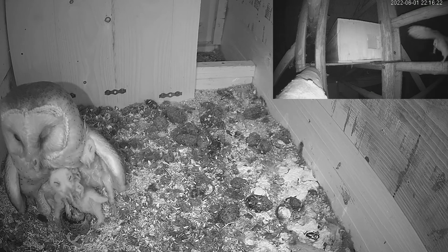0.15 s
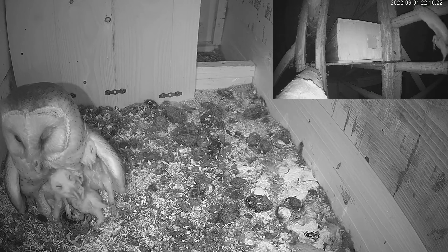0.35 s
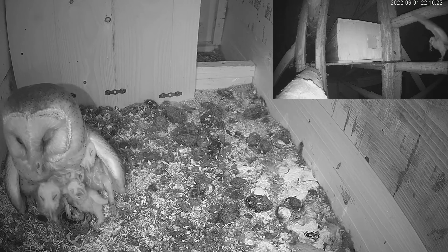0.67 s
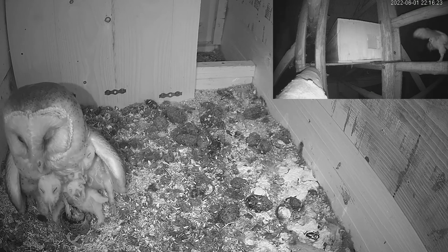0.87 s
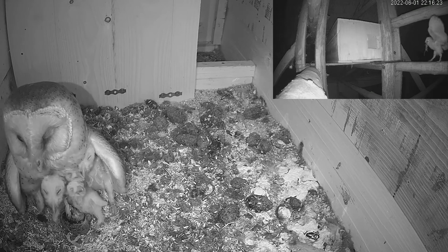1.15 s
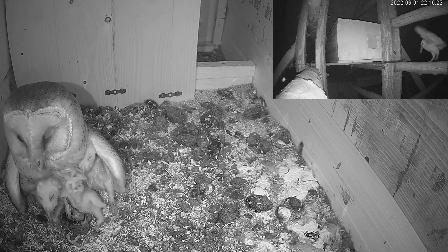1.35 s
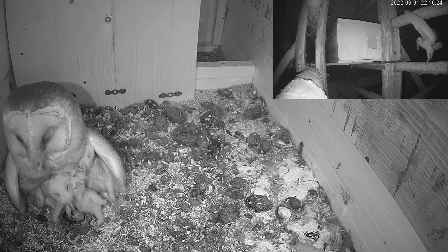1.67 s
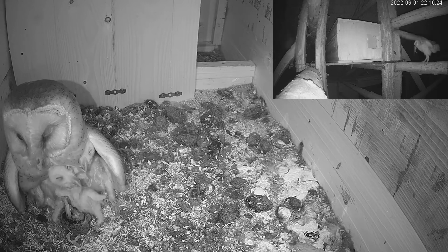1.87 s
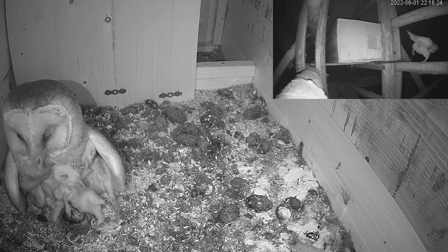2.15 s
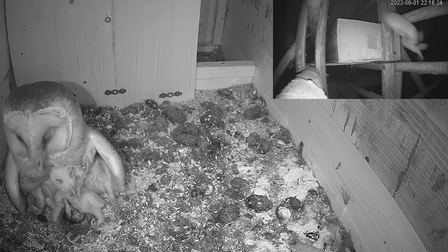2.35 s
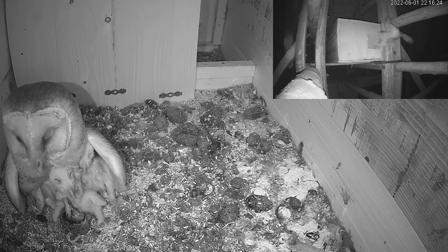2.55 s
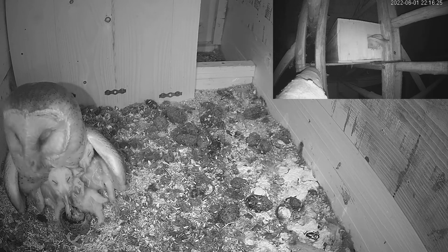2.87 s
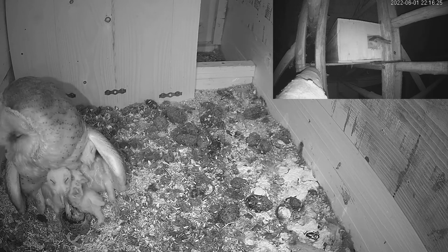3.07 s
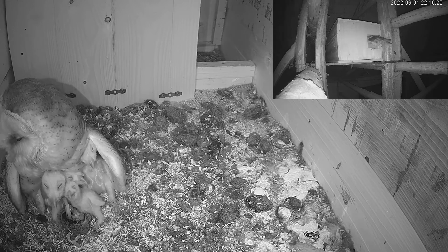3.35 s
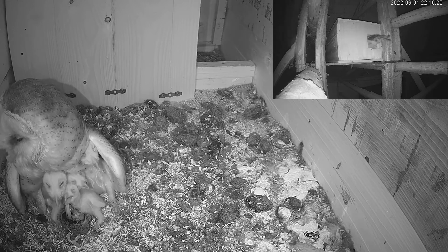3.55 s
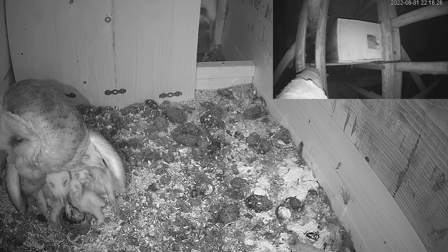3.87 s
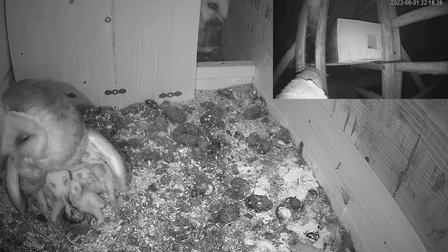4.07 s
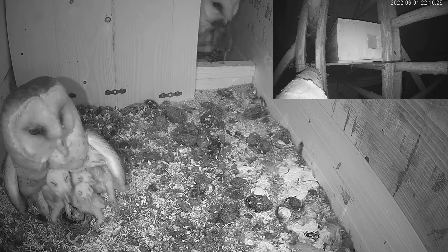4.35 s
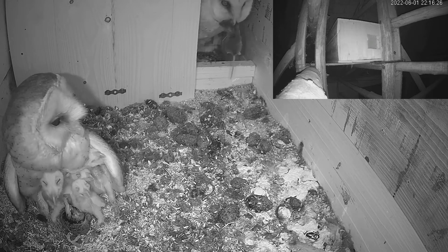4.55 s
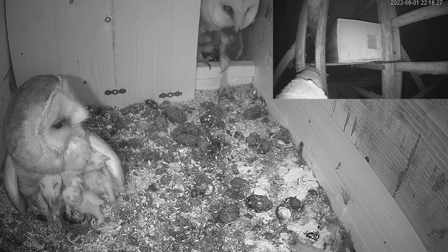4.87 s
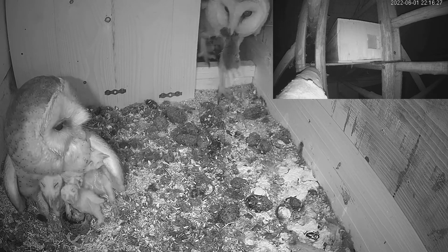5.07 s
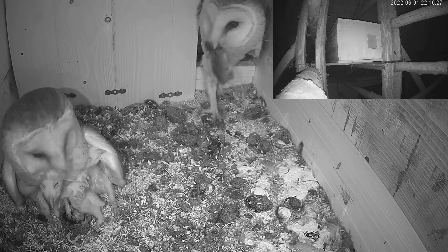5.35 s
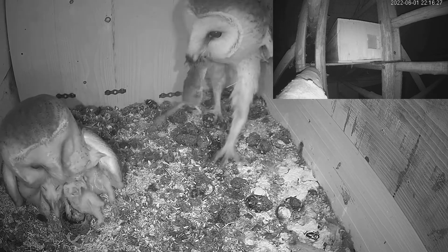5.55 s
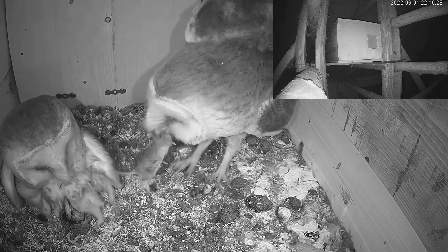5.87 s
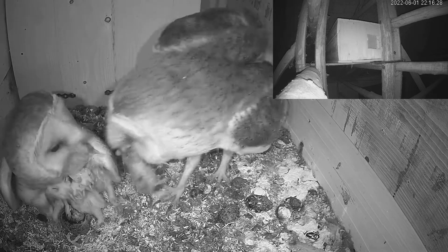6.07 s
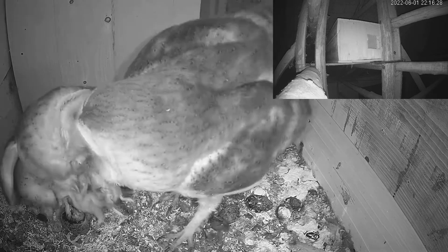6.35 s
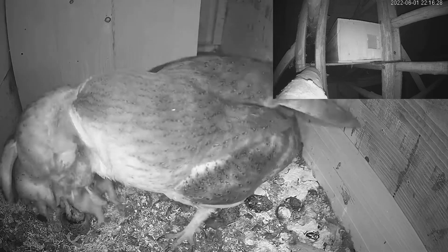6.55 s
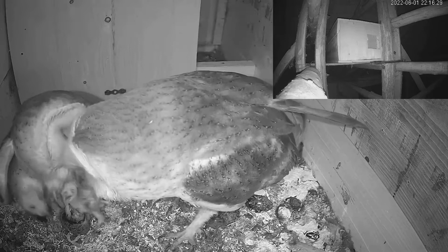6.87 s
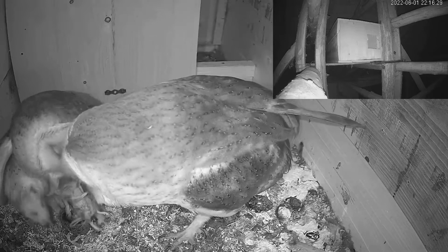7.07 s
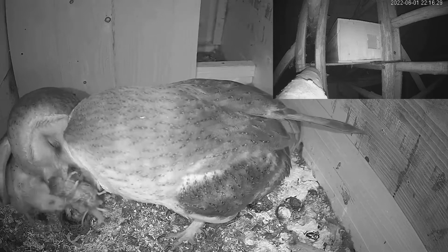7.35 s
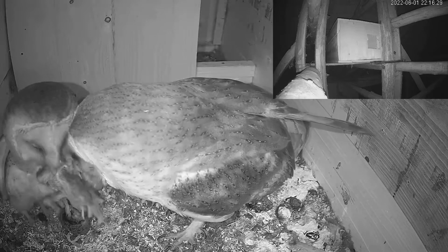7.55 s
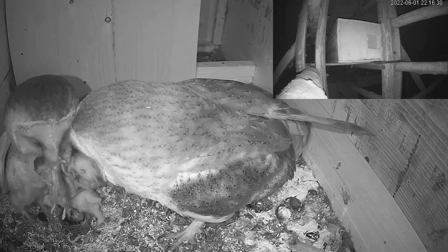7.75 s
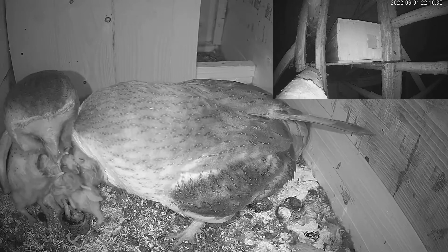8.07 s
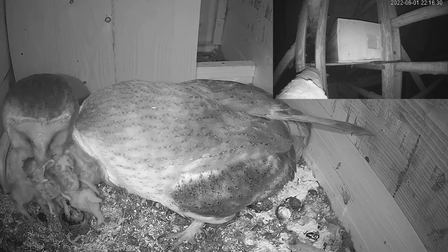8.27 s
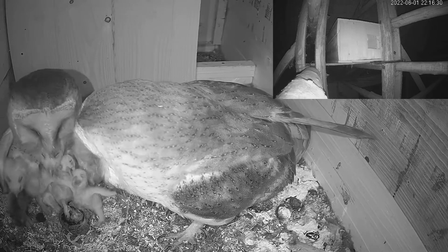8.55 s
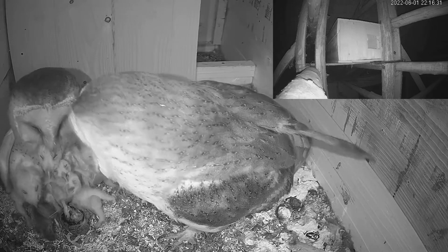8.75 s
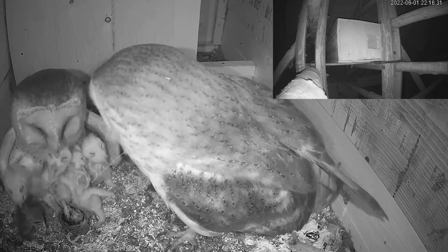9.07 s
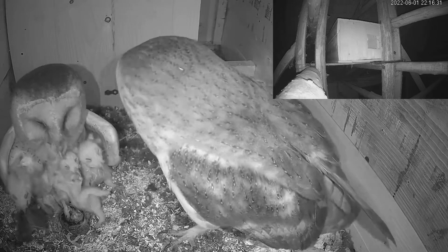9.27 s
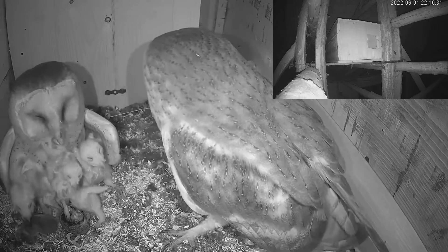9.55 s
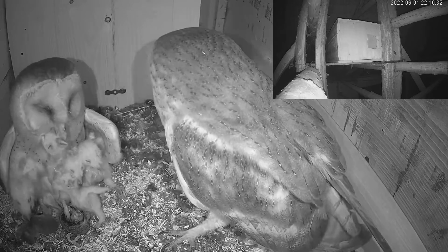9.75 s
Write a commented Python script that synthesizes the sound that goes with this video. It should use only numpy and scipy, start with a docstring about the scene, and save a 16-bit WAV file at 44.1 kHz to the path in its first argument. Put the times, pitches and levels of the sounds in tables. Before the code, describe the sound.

Inside a small wooden nest box at night, heard from a close mono microphone with faint rumble and hiss. A half-second, bright hissing snore starts at 0.4 s and ends in a tiny squeak. Very faint footfalls come near 1.1 s. At 2.0 s a heavy, low, boomy thump with a gritty scrape marks an owl landing, and a second long hiss follows at 2.35 s. Knocks and claw scrapes scramble over wood from 2.85 to 3.75 s, sharpest at 3.4. A throaty rasp opens into hiss at 3.9 s; light scratching follows. From 4.9 to 6 s, soft twittering overlaps rough rasps at 5.1 and 5.95. Another hiss at 6.35 s mixes with quick chips until 6.65. More chips at 7.1-7.4 s lead into a rasp that becomes a hiss until 7.9. A long hiss comes at 8.3 s, a soft low thud at 9.0, and a last short rasp with a squeak at 9.4-9.75.

```python
"""Barn owls snore in a wooden nest box at night, close to a small mono camera microphone.
Long hisses (turbulent noise through beak resonances) and lower, throaty rasps (saturated noise)
follow each other, most ending in a tiny gliding harmonic squeak. The male lands with a thump (decaying
box modes), scrambles in (grainy noise scrapes) and twitters, in short notes with an octave, as he hands
over prey. Faint rumble, hiss and a thin treble ring lie beneath; short echoes make the box."""
import sys
import numpy as np
from scipy import signal
from scipy.fft import rfft, irfft, next_fast_len
from scipy.io import wavfile
from scipy.ndimage import uniform_filter1d, map_coordinates

SR = 44100
rng = np.random.default_rng(int(sys.argv[2]) if len(sys.argv) > 2 else 0)


def master_out(mix):
    """Clip the mix to full scale and print it as 16-bit PCM to the path in sys.argv[1]."""
    frames = np.transpose(np.atleast_2d(mix))
    ceiling = np.clip(frames, -1, 1)
    pcm = np.round(ceiling * 32767).astype(np.int16)
    wavfile.write(sys.argv[1], SR, pcm)


N = 437031
TIME = np.arange(N) / SR
FREQS = np.maximum(np.fft.rfftfreq(next_fast_len(N, True), 1 / SR), 1)
TOP_HZ = 13250  # upper limit of the microphone

SNORE_ATTACK_S, SNORE_RELEASE_S = 0.056, 0.015
SNORE_SWELL_DB, SNORE_SAG_DB = 12, 13
SIZZLE_SWELL_DB, SIZZLE_SAG_DB = 12.5, 12
SWELL_POWER, SAG_POWER = 2.06, 3.5  # curvature of effort before and after the crest
BURST_SHARE, BURST_S = 0.45, 0.01  # the air breaks through at once with this share of its strength
CATCH_AFTER_S, CATCH_S, CATCH_DB = 0.006, 0.0063, -0.5  # a last puff of air as the throat closes

RASP_ATTACK_S, RASP_RELEASE_S = 0.0093, 0.023
BEAK_OPENS_S, BEAK_SHUTS_S = 0.02, 0.051  # time constant of opening; fade of the treble at the end
MOUTH_FOLLOWS, TREBLE_FOLLOWS = 0.81, 0.31  # dB per dB of effort
BEAK_SWEEP_S, THROAT_RISE_SHARE = 0.07, 0.7  # the throat resonance rises less than those of the beak

CHIP_GLIDE, CALM_S = -0.324, 6.31  # chips fall by this share of pitch until the birds meet, then stay level
CHIP_OCTAVE_DB, OCTAVE_FOLLOWS = -43.5, 0.22  # the octave gains little with level: soft chips are brightest
TWITTER_PERIOD_S, TWITTER_SCATTER = 0.047, 0.0184  # scatter as share of pitch
PEEP_S, PEEP_OCTAVE_DB = 0.03, 14.5  # a peep sounds mostly on its octave
PEEP_GLIDE_SCATTER = 0.084  # share of pitch
TICK_AFTER_S, TICK_S, TICK_DB, TICK_OCTAVE_DB = 0.042, 0.0078, -4.5, 7.5  # level relative to peep's octave

SCRATCH_GAP_S, SCRATCH_SCATTER_S, SCRATCH_SCATTER_DB = 0.045, 0.0044, 1
SCRATCH_T60_S, SCRATCH_HZ = 0.13, 2230
SHUFFLE_FADE_S = 0.17
FLOOR_DB = -64
RING_HZ, RING_DB = 9647, -12  # level relative to the treble around it


def snores(flutter_db=0.5, flutter_hz=90, throat_db=1.5, hiss_db=-1.43, sizzle_db=-1.03):
    """Turbulent jet noise filtered by the open beak; the throat joins in as effort grows."""
    # hisses, levels before the common trims above: (start [s], length [s], hiss [dB],
    # crest [share of length], throat [dB], throat growth over the call [dB], sizzle [dB],
    # sizzle crest [share of length])
    calls = [(0.393, 0.5586, -34.5, 0.67, -55.5, 2.5, -43, 0.48),
             (2.347, 0.55, -35, 0.59, -49, 15.5, -43, 0.44),
             (6.351, 0.5165, -38, 0.78, -57, -3, -45.5, 0.32), (8.275, 0.56, -35, 0.62, -49, 5, -38, .52)]
    # resonances of beak and box in the first two hisses: (frequency [Hz], width [Hz], relative level [dB])
    first_rows = [(710, 930, -25), (1300, 560, -15), (1940, 66, -17), (2660, 1460, -14.5), (3737, 460, -5),
                  (4330, 80, -11.5), (5000, 530, -7), (5856, 340, -1.5), (6390, 190, 3.5), (6970, 640, 5.5),
                  (8150, 720, 3.5), (9340, 670, -2.5), (10740, 410, -4), (11400, 470, -1),
                  (12460, 1600, -2)]
    # the same in the last two hisses, with the head held differently: (frequency [Hz], width [Hz], relative
    # level [dB])
    second_rows = [(804, 1320, -14.5), (1040, 100, -11.5), (2120, 970, -13), (2840, 900, -11),
                   (3580, 830, -2.5), (4340, 120, -11), (5000, 590, -1), (6380, 1600, 3.5),
                   (6860, 370, 9.5), (8150, 910, -2), (9380, 710, -3.5), (10600, 410, -6),
                   (12000, 1500, -4)]
    out = np.zeros(N)
    first_pose, second_pose = resonances(first_rows), resonances(second_rows)
    low, middle, high = band(150, 2790), band(2880, 6120), band(7470, 12400)
    shapes = (first_pose, first_pose, second_pose, second_pose)
    for call, shape in zip(calls, shapes):
        start, length, hiss, crest, throat, growth, sizzle, sizzle_crest = call
        progress = np.clip((TIME - start) / length, 0, 1)
        throat_effort = growth * (progress - 0.5) + arch(start, length, crest, swell_db=4, sag_db=7.5)
        hiss_effort = arch(start, length, crest, SNORE_SWELL_DB, SNORE_SAG_DB)
        sizzle_effort = arch(start, length, sizzle_crest, SIZZLE_SWELL_DB, SIZZLE_SAG_DB)

        jet = noise(shape * low) * undb(throat + throat_db + throat_effort)
        jet += noise(shape * middle) * undb(hiss + hiss_db + hiss_effort)
        jet += noise(shape * high) * undb(sizzle + sizzle_db + sizzle_effort)

        burst = gate(start, length, BURST_S, SNORE_RELEASE_S)
        steady = gate(start, length, SNORE_ATTACK_S, SNORE_RELEASE_S) ** 2
        catch_time = TIME - start - length - CATCH_AFTER_S
        catch = undb(CATCH_DB) * np.exp(-(catch_time / CATCH_S) ** 2)
        out += jet * (catch + BURST_SHARE * burst + (1 - BURST_SHARE) * steady)
    flutter = unit(undb(flutter_db * wander(flutter_hz)))
    return out * flutter


def rasps(rattle_db=1.0, rattle_hz=220, buzz=0.058):
    """Source and filter: the syrinx rattles chaotically into the throat; upper bands open with the beak."""
    # rasps; the fourth runs on into the fifth, a hiss. Throat lies below 1.6 kHz, mouth reaches 3 kHz,
    # beak about 9 kHz, sizzle 13 kHz: (start [s], length [s], throat [dB], crest [share of length],
    # swell [dB], sag [dB], mouth [dB], beak [dB], sizzle [dB], beak opens at [s],
    # treble gained by opening [dB], rise of the resonances [share])
    calls = [(3.924, 0.4934, -40, 0.59, 28.5, 15, -42, -40, -46.5, 4.203, 19, 0.00024),
             (5.095, 0.35, -40.5, 0.57, 8.5, 11, -48, -61, -63.5, 5.07, 21, 0.039),
             (5.945, 0.33, -34.5, 0.86, 13.5, 25, -43, -53.5, -46.5, 6.1, 16, 0.095),
             (7.387, 0.3, -35.5, 0.35, 7, 11.5, -47, -51.5, -46.5, 7.45, 7, 0.052),
             (7.531, 0.354, -47, 0.2, 18, 4, -47.5, -43, -43, 7.6, 14, .1),
             (9.416, 0.319, -34, 0.59, 16, 12.5, -47, -50, -51, 9.485, 12, .07)]
    # throat and beak resonances, one set per rasp: (frequency [Hz], width [Hz], relative level [dB])
    resonance_sets = [
        [(456, 280, -7.5), (1286, 870, 0.5), (2140, 290, -4.5), (2620, 270, -2.5), (3200, 370, -9.5),
         (4600, 1050, -16), (5120, 160, -9), (5980, 650, -17), (8000, 2200, -24.5), (9260, 280, -17),
         (13100, 6200, -20)],
        [(480, 500, -15), (1095, 430, -4), (1370, 300, -4), (1890, 63, -9), (2570, 1250, -16),
         (4870, 890, -25.5), (6070, 250, -28), (12000, 2600, -23)],
        [(715, 1400, -14.5), (1147, 410, 4.5), (1348, 77, 6.5), (1930, 590, -11), (2470, 610, -10.5),
         (4860, 1400, -30), (9500, 900, -28.5), (11500, 10000, -33), (12600, 1100, -25)],
        [(430, 380, -16), (1047, 240, -1), (1310, 260, 0), (1840, 220, -12.5), (2640, 1500, -17.5),
         (3600, 570, -17), (6400, 1300, -21.5), (7900, 1900, -25), (9460, 1100, -19), (12100, 2500, -29)],
        [(566, 340, -7.5), (1050, 430, -2.5), (1720, 880, -8), (2410, 390, -7), (3340, 710, -4),
         (4300, 660, -3), (5380, 1100, 1), (6500, 2300, -2), (7730, 790, 0.5), (9330, 660, -4.5),
         (10600, 600, -6), (12300, 1900, -11)],
        [(450, 280, -19), (1054, 480, -8), (1407, 104, 2), (2070, 390, -12.5), (2790, 920, -14.5),
         (4810, 320, -29), (5620, 600, -22.5), (7800, 5000, -27.5), (11940, 1400, -19)],
    ]
    out = np.zeros(N)
    low, middle, high, top = band(100, 1610), band(1870, 3150), band(3250, 9600), band(7260, 13000)
    for call, rows in zip(calls, resonance_sets):
        start, length, throat, crest, swell, sag, mouth, beak, sizzle, opens, opening_db, rise = call
        shape = resonances(rows)
        effort = arch(start, length, crest, swell, sag)

        throat_noise = sweep(noise(shape * low), opens, THROAT_RISE_SHARE * rise)
        analytic = signal.hilbert(throat_noise, next_fast_len(N))[:N]
        # a self-sustained vibration saturates, so its strength is steadier than that of noise
        saturated = analytic.real / np.sqrt(1 + buzz * np.abs(analytic) ** 2)
        voiced = unit(saturated) * undb(throat + effort)
        air = noise(shape * middle) * undb(mouth + MOUTH_FOLLOWS * effort)

        shut = 0.5 - 0.5 * np.tanh((TIME - opens) / (2 * BEAK_OPENS_S))
        treble = noise(shape * high) * undb(beak) + noise(shape * top) * undb(sizzle)
        treble = sweep(treble, opens, rise) * undb(TREBLE_FOLLOWS * effort - opening_db * shut)

        out += (voiced + air) * gate(start, length, RASP_ATTACK_S, RASP_RELEASE_S)
        out += treble * gate(start, length, RASP_ATTACK_S, BEAK_SHUTS_S)
    rattle = unit(undb(rattle_db * wander(rattle_hz)))
    return out * rattle


def squeaks(jitter=0.037, spread=0.46, darken=2.66, attack=0.83):
    """Membranes catch and whistle: harmonics under a spectral hump that moves with the gliding pitch."""
    # squeaks: (start [s], length [s], start pitch [Hz], end pitch [Hz], level before the fades [dB],
    # brightest frequency at the start [Hz])
    whistles = [(0.0, 0.029, 4230, 4680, -56.5, 3680), (0.946, 0.019, 2146, 1190, -46.5, 7200),
                (2.402, 0.019, 9000, 10200, -46.5, 8500), (2.446, 0.046, 10440, 12100, -44, 9200),
                (2.889, 0.019, 2320, 1260, -49.5, 6440), (4.413, 0.016, 1550, 1070, -49, 2700),
                (6.864, 0.024, 2480, 1480, -50, 6700), (8.833, 0.0151, 2120, 1240, -43.5, 7900),
                (9.724, 0.015, 5400, 5100, -40.5, 9100), (9.737, 0.011, 5060, 2840, -51.5, 7100),
                (9.859, 0.0045, 9400, 6900, -58, 9000)]
    out, wobble = np.zeros(N), wander(690)
    for start, length, from_hz, to_hz, db, bright_hz in whistles:
        u = np.linspace(0, 1, int(length * SR))
        i = int(start * SR)
        glide = to_hz / from_hz
        hz = from_hz * glide ** u * (1 + jitter * wobble[i:i + len(u)])
        partials = np.arange(1, 8)[:, None] * hz
        centre = bright_hz * glide ** (2 * darken * u ** 2)
        weights = np.exp(-(np.log(partials / centre) / spread) ** 2 / 2) * (partials < TOP_HZ)
        phases = 2 * np.pi * np.cumsum(partials, axis=1) / SR
        tone = np.sum(weights * np.sin(phases), axis=0)
        add(out, start, undb(db) * unit(tone) * np.sin(np.pi * u ** attack))
    return out


def twitter(bow=0.14, snap=1.26, jitter=0.028, third_db=-27, air_db=-9, breathy=0.79, gain_db=-2.03):
    """Additive synthesis of short arched or falling notes; those with a stronger octave carry more air."""
    out, puff = np.zeros(N), np.zeros(N)
    wobble = wander(290)
    for start, length, hz, db, octave_db, glide in twitter_notes():
        # the notes' soft edges reach beyond the listed start and length
        u = np.linspace(0, 1, int(1.283 * length * SR))
        shape = np.sin(np.pi * u)
        i = int(start * SR)
        bend = bow * (shape - 0.8) + glide * (u - 0.5) + jitter * wobble[i:i + len(u)]
        phase = 2 * np.pi * np.cumsum(hz * (1 + bend)) / SR
        tone = np.sin(phase) + undb(octave_db) * np.sin(2 * phase) + undb(third_db) * np.sin(3 * phase)
        add(out, start - 0.18 * length, np.sqrt(2) * undb(db) * np.abs(shape) ** snap * tone)
        # the air leads the tone
        add(puff, start - 0.51 * length, undb(db + breathy * octave_db) * shape)
    air = noise(resonances([(990, 1130, 2.5), (2900, 350, 1.0), (9200, 870, -9.0), (11900, 1400, -12)]))
    return undb(gain_db) * (out + undb(air_db) * puff * air)


def twitter_notes():
    """Pulse trains with random pitch: (start s, nominal length s, pitch Hz, dB, relative octave dB, glide)."""
    # loud chips, before the common gain: (start [s], nominal length [s], pitch [Hz], level [dB])
    chips = [(4.935, .012, 1173, -51.5), (5.006, 0.017, 1228, -46), (5.07, 0.011, 1135, -47),
             (5.098, .011, 1130, -49), (5.447, .018, 1150, -48), (5.486, 0.014, 1222, -33),
             (5.52, .0045, 1190, -38), (5.528, 0.0081, 1164, -43), (5.545, 0.012, 1179, -37),
             (5.565, .01, 1236, -42.5), (5.628, 0.0145, 1237, -40), (5.68, 0.012, 1495, -45.5),
             (5.729, 0.0091, 1320, -39), (5.751, 0.0064, 1190, -39.5), (6.263, 0.02, 1100, -37.5),
             (6.364, 0.011, 1078, -33), (6.382, 0.005, 1080, -31.5), (6.401, .012, 1178, -32.5),
             (6.431, .045, 1197, -35.5), (6.488, 0.041, 1197, -37), (6.596, 0.0059, 1074, -36),
             (6.617, 0.0092, 1097, -31), (7.115, .012, 1133, -50), (7.167, 0.0109, 1037, -37),
             (7.186, 0.0061, 1012, -33.5), (7.237, 0.0038, 1010, -39), (7.25, 0.0039, 1100, -35.5),
             (7.259, .013, 1034, -32), (7.316, 0.004, 1030, -41), (7.384, 0.013, 1116, -36),
             (9.412, 0.016, 1024, -38), (9.723, 0.019, 1166, -44)]
    # soft runs of thin peeps alternating with breathy ticks, before the common gain:
    # (start [s], length [s], mean pitch [Hz], level of the peep's octave [dB], mean peep glide [share of pitch])
    peep_runs = [(0.058, .21, 1174, -70, 0), (0.963, .02, 1018, -60, 0), (1.045, .02, 946, -63.5, -0.014),
                 (4.988, .02, 1300, -51, -0.32), (5.045, .02, 1160, -47.5, 0.022),
                 (5.474, .02, 1168, -45.5, -0.13), (5.666, .02, 1160, -50.5, -0.11),
                 (5.712, .02, 1118, -47, -.2), (5.788, .165, 1163, -50.5, 0), (7.111, .02, 1118, -61, 0)]
    notes = []
    for s, length, hz, db in chips:
        octave_db = CHIP_OCTAVE_DB + OCTAVE_FOLLOWS * db - db
        notes.append((s, length, hz, db, octave_db, CHIP_GLIDE * (s < CALM_S)))
    chances = rng.standard_normal((len(peep_runs), 10, 2))
    for (start, length, hz, db, glide), chance in zip(peep_runs, chances):
        end = start + length
        for s, (sharp, bend) in zip(np.arange(start, end, TWITTER_PERIOD_S), chance):
            pitch = hz * (1 + TWITTER_SCATTER * sharp)
            peep_glide = glide + PEEP_GLIDE_SCATTER * bend
            notes.append((s, PEEP_S, pitch, db - PEEP_OCTAVE_DB, PEEP_OCTAVE_DB, peep_glide))
            tick_at = s + TICK_AFTER_S
            if tick_at < end:
                notes.append((tick_at, TICK_S, pitch, db + TICK_DB, TICK_OCTAVE_DB, CHIP_GLIDE))
    return notes


def blows(boards_db=-19, boards_t60=0.21, spread=1.68):
    """Modal excitation: weight and hardness of a footfall decide which register of box modes it reaches."""
    # modes of the box: (frequency [Hz], relative level [dB], full t60 [s])
    box_modes = [(53.7, -2, 0.72), (77, -2, 0.29), (101, -12, 0.075), (121.2, 7.5, 0.3), (152.3, 1, 0.21),
                 (214, -13.5, 0.27), (303.8, -5, 0.36), (398.3, -6, 0.31), (440.6, 8, 0.12),
                 (497.7, -1, 0.26), (564, 7.5, 0.05), (796, 3, 0.13), (1067, 11, 0.038), (1305, -3, 0.055)]
    # feet on the boards: (start [s], peak level [dB], register [Hz], rise [s], share of full ring time)
    footfalls = [(1.106, -55, 490, .015, 1.3), (1.196, -52, 85, .008, 1.4),
                 (1.984, -13.5, 126, 0.012, 1.09), (1.988, -30.5, 470, 0.0046, .4),
                 (2.851, -39, 430, 0.0054, 0.81), (2.893, -36.5, 125, 0.0051, 0.54),
                 (3.059, -36, 125, 0.0023, 1.2), (3.116, -35, 495, 0.0042, 0.53),
                 (3.167, -37, 220, 0.0063, 1.4), (3.383, -28.5, 483, 0.0022, 0.79),
                 (3.401, -24.5, 390, 0.00057, 0.5), (3.405, -28.5, 67.6, 0.0025, 0.64),
                 (3.693, -37.5, 534, 0.0024, 0.72), (3.745, -55, 565, 0.0043, 0.93),
                 (4.484, -52, 550, .008, 0.95), (4.273, -44, 131, 0.0039, 0.4),
                 (4.724, -44.5, 516, 0.0025, 0.14), (4.82, -40.5, 98, 0.013, 0.27),
                 (5.587, -39.5, 103, 0.022, .3), (6.374, -41.5, 91, 0.0071, 0.47),
                 (7.025, -45, 75, 0.0084, 0.56), (9.012, -36, 65.6, 0.0058, 1.12),
                 (9.013, -45.5, 210, .004, 0.37), (9.77, -51.5, 60, 0.013, 0.58)]
    out, t = np.zeros(N), TIME[:SR * 3 // 4]
    for start, db, centre_hz, rise, share in footfalls:
        ring = np.zeros(len(t))
        for hz, mode_db, t60 in box_modes:
            reach = 1 / (1 + ((hz / centre_hz - centre_hz / hz) / spread) ** 2) ** 2
            ring += undb(mode_db) * reach * np.sin(2 * np.pi * hz * t) * decay(t, t60 * share)
        # loose boards and litter add a dense, irregular rumble
        edges = [centre_hz / 2, centre_hz * 1.53]
        rumble = unit(bandpassed(rng.standard_normal(len(t)), edges))
        ring = ring / np.abs(ring).max() + undb(boards_db) * rumble * decay(t, boards_t60)
        ring = ring * (1 - np.exp(-(t / rise) ** 2))
        add(out, start, undb(db) * ring / np.abs(ring).max())
    return out


def claws(grain_db=4, rise=0.0025, low_hz=400):
    """Stick-slip friction: talons catch on the wood in short, grainy bursts of band-limited noise."""
    # claws and bills on wood: (start [s], level before rise and decay [dB], t60 [s], upper band edge [Hz])
    scrapes = [(1.976, -41.5, 0.11, 2630), (2.045, -28.5, .039, 4800), (3.06, -46, .074, 1260),
               (3.114, -42, .1, 1780), (3.155, -46.5, 0.16, 1800), (3.218, -52, .093, 2800),
               (3.381, -33.5, 0.023, 2010), (3.397, -29, 0.033, 1890), (3.477, -55, 0.05, 2000),
               (3.697, -50, 0.083, 1440), (4.724, -43, 0.053, 1500), (5.588, -48.5, 0.11, 7500),
               (7.888, -46.5, .039, 2000), (8.133, -44, 0.045, 2030)]
    out, t = np.zeros(N), TIME[:SR // 4]
    for start, db, t60, bright_hz in list(scrapes) + scratches():
        # each grain holds a random level for 40 samples
        grain_levels = np.repeat(rng.standard_normal(len(t)), 40)[:len(t)]
        grains = rng.standard_normal(len(t)) * undb(grain_db * grain_levels)
        scrape = unit(bandpassed(grains, [low_hz, bright_hz]))
        add(out, start, undb(db) * scrape * decay(t, t60) * (1 - np.exp(-t / rise)))
    return out


def scratches():
    """Jittered pulse trains of light scrapes as (start s, dB, t60 s, upper band edge Hz)."""
    # scratching between the loud scrapes: (start [s], length [s], mean level before rise and decay [dB])
    spells = [(2.174, .13, -57.5), (4.485, .4, -60.5)]
    events = []
    for start, length, db in spells:
        for s in np.arange(start, start + length, SCRATCH_GAP_S):
            late, hard = rng.standard_normal(2)
            events.append((s + SCRATCH_SCATTER_S * late, db + SCRATCH_SCATTER_DB * hard,
                           SCRATCH_T60_S, SCRATCH_HZ))
    return events


def shuffle():
    """Random forcing of resonators: small steps keep the low modes of the box humming."""
    # spells of shuffling on the boards: (start [s], length [s], hum of the main mode [dB], deep rumble [dB])
    spells = [(2.056, 1.33, -54.5, -69), (2.94, 0.71, -52.5, -63), (4.2, 1.25, -64.5, -59),
              (5.29, 0.65, -68, -61.5), (6.145, 1.3, -76.5, -64)]
    out = np.zeros(N)
    hum = noise(resonances([(116, 21, 5.5), (426, 240, -23.5)]))
    rumble = noise(resonances([(90, 41, -11), (52, 29, -12), (407, 320, -25.5)]))
    for start, length, hum_db, rumble_db in spells:
        steps = undb(hum_db) * hum + undb(rumble_db) * rumble
        out += steps * gate(start, length, SHUFFLE_FADE_S, SHUFFLE_FADE_S)
    return out


def background():
    """Stationary noise with a shaped spectrum: faint night rumble and even microphone hiss."""
    # spectrum of night air and microphone: (frequency [Hz], relative density [dB per Hz])
    spectrum = [(15, -53), (25, -1.5), (103, -4.5), (144, -11.5), (203, -13), (400, -15.5), (507, -16),
                (641, -18.5), (1730, -23), (2370, -25), (2630, -26.5), (13000, -34)]
    hz, db = np.transpose(spectrum)
    gain = undb(np.interp(np.log(FREQS), np.log(hz), db))
    return noise(gain) * undb(FLOOR_DB)


def treble_ring(x):
    """Amplitude modulation: a thin, steady pitch swells with the treble around it."""
    nearby = filtered(x, band(8500, 11000))
    strength = np.sqrt(np.abs(uniform_filter1d(nearby ** 2, size=SR // 50)))
    return undb(RING_DB) * strength * np.sqrt(2) * np.sin(2 * np.pi * RING_HZ * TIME)


def box_echo(x, t60, wet_db):
    """Diffuse reverberation: dense, very short reflections between the walls of the box."""
    t = TIME[:SR // 5]
    tail = rng.standard_normal(len(t)) * decay(t, t60) * (t > 0.002)
    tail = unit(tail) / np.sqrt(len(t))  # unit energy
    return x + undb(wet_db) * signal.fftconvolve(x, tail)[:N]


def sweep(x, opens, share):
    """Resampling at a changing speed slides the resonances upwards as the beak opens."""
    speed = 1 + share * (0.5 * np.tanh((TIME - opens) / BEAK_SWEEP_S) - 0.35)
    return map_coordinates(x, [np.cumsum(speed)], order=3, mode="mirror")


def arch(start, length, crest, swell_db, sag_db):
    """Effort envelope of one call in dB: it swells to 0 at the crest and sags towards the end."""
    u, crest = np.clip((TIME - start) / length, 0, 1), np.clip(crest, 0.05, 0.95)
    swell = np.maximum(1 - u / crest, 0) ** SWELL_POWER
    sag = np.maximum((u - crest) / (1 - crest), 0) ** SAG_POWER
    return -swell_db * swell - sag_db * sag


def gate(start, length, attack, release):
    """Linear amplitude envelope that opens, holds and closes."""
    opening = np.clip((TIME - start) / attack, 0, 1)
    return opening * np.clip((start + length - TIME) / release, 0, 1)


def decay(t, t60):
    """Exponential damping by 60 dB in t60 seconds."""
    return np.exp(-np.log(1000) * t / t60)


def resonances(rows):
    """Power sum of steep resonators side by side, as gain per frequency."""
    power = 0
    for hz, width, db in rows:
        detuning = (FREQS / hz - hz / FREQS) * hz / width
        power = power + undb(db) ** 2 / (1 + detuning ** 2) ** 2
    return np.sqrt(power)


def band(lo_hz, hi_hz):
    """Gain of a steep band-pass with power-law slopes."""
    return 1 / np.sqrt((1 + (lo_hz / FREQS) ** 20) * (1 + (FREQS / hi_hz) ** 20))


def bandpassed(x, edges_hz):
    """Causal band-pass filtering of a short sound."""
    return signal.sosfilt(signal.butter(2, edges_hz, "bandpass", fs=SR, output="sos"), x)


def filtered(x, gain):
    """Spectral multiplication: apply a gain at each frequency."""
    size = next_fast_len(N, True)
    return irfft(rfft(x, size) * gain, size)[:N]


def noise(gain):
    """White noise shaped by a gain at each frequency, rms 1."""
    return unit(filtered(rng.standard_normal(N), gain))


def wander(hz):
    """Low-passed noise: random movement, slower than hz, with spread 1."""
    return noise(1 / (1 + (FREQS / hz) ** 4))


def undb(db):
    """Logarithmic level to amplitude: decibels to gain."""
    return 10 ** (np.asarray(db) / 20)


def unit(x):
    """Energy normalisation: scale to rms 1."""
    return x / np.sqrt(np.mean(x ** 2) + 1e-20)


def add(out, start, x):
    """Superposition: mix a short sound in at a time in seconds."""
    i = max(int(start * SR), 0)
    out[i:i + len(x)] += x[:N - i]


def scene():
    """Superposition of all sounds in the small box at one microphone."""
    calls = box_echo(snores() + rasps(), t60=0.058, wet_db=-11)
    short_sounds = box_echo(squeaks() + twitter() + claws(), t60=0.049, wet_db=-6)
    mono = calls + short_sounds + blows() + shuffle() + background()
    mono = mono + treble_ring(mono)
    return np.array([mono, mono])


def record(dry):
    """Band limiting: the camera cuts the top of the treble with a steep low-pass."""
    return signal.sosfilt(signal.ellip(10, 0.2, 70, TOP_HZ, fs=SR, output="sos"), dry)


dry = scene()
out = record(dry)
master_out(out)
```